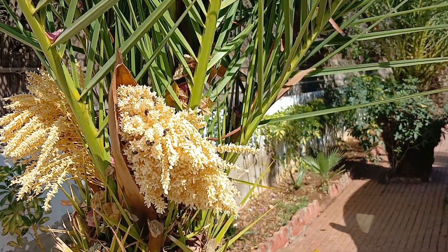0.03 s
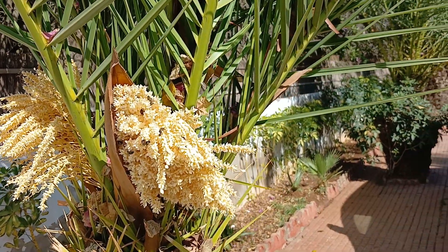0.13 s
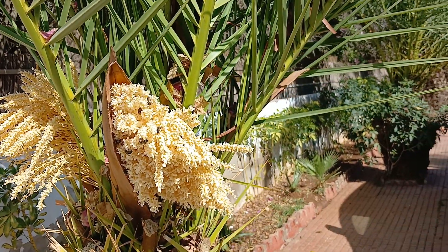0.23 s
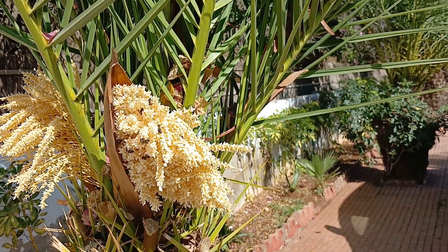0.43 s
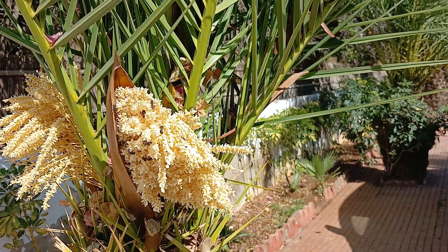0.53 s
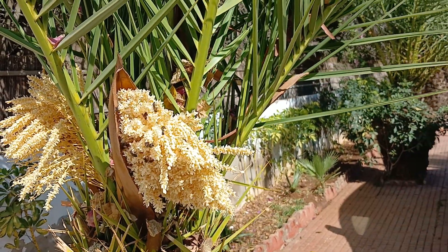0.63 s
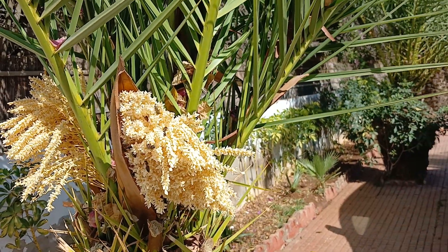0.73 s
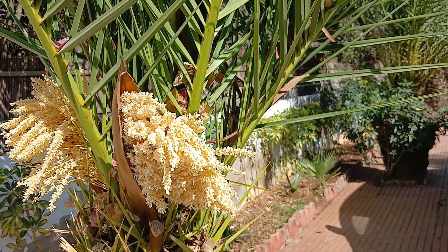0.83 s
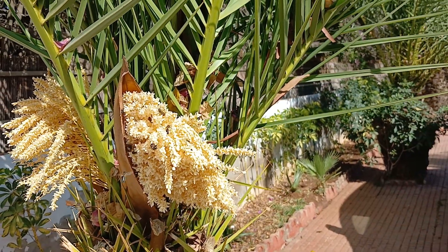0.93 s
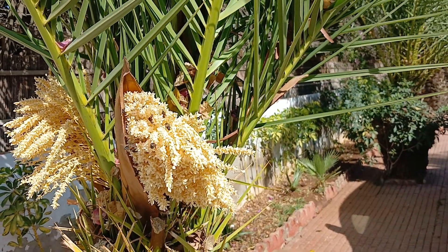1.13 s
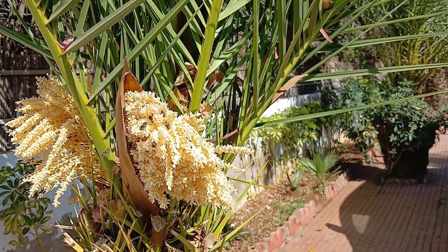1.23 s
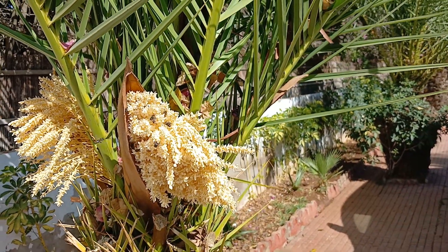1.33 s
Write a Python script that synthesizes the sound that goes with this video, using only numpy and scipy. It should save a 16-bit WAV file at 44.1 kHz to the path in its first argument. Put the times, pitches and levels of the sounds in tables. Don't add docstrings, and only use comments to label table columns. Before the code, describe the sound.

A bee buzzes extremely close to the left microphone outdoors, wings scraping the grille just before a hard, low thump; it flies off dulling, leaving a faint distant rumble and barely audible rustle of fronds.

```python
import sys
import numpy as np
from scipy import signal
from scipy.fft import rfft, irfft
from scipy.io import wavfile
from scipy.ndimage import uniform_filter1d

SR = 44100
rng = np.random.default_rng(int(sys.argv[2]) if len(sys.argv) > 2 else 0)


def natural_amplitude(level_db):
    exponent = np.asarray(level_db, float) / 20
    return 10 ** exponent


def dump(signal):
    limited = np.clip(np.atleast_2d(signal).T, -1, 1)
    pcm = np.round(limited * 32767).astype(np.int16)
    wavfile.write(sys.argv[1], SR, pcm)


N = 61739
T = np.arange(N) / SR
STROKE_AT = 0.4225


def curve(table, column):
    rows = np.array(table, float)
    return uniform_filter1d(np.interp(T, rows[:, 0], rows[:, column]), size=400)


def walk(rate):
    hold = int(SR / rate)
    steps = rng.standard_normal(N // 100 + 1)[:N // hold + 1]
    slewed = uniform_filter1d(np.repeat(steps, hold), hold)
    return 1.4 * uniform_filter1d(slewed, hold)[:N]


def unit(x):
    return x / np.sqrt(np.mean(x ** 2))


def colour(points, source=None):
    hz = np.arange(N // 2 + 1) * SR / N + 1
    rows = np.array(points, float)
    db = np.interp(np.log(hz), np.log(rows[:, 0]), rows[:, 1], left=-60, right=rows[-1, 1])
    if source is None:
        source = rng.standard_normal(N)
    return irfft(rfft(source) * natural_amplitude(db) * np.sqrt(SR / 2), N)


def bands(x, lift_db, swell, edge=12):
    flicker_db, swell_db = 1.0, 0.6
    spec = rfft(x)
    pitch = np.log2(np.arange(N // 2 + 1) * SR / N + 1)
    out = 0
    for octave in range(4, 16):
        share = np.cos(np.pi / 2 * np.clip(pitch - octave, -1, 1)) ** 2
        level = flicker_db * walk(14.37) + swell_db * swell + lift_db * (octave >= edge)
        out = out + irfft(spec * share, N) * natural_amplitude(level)
    return out


# [t/s, level/dB, treble lift/dB]
BREEZE = [(0, -90, 4.5), (.2, -90, 0.5), (.45, -87.5, -3.5), (.62, -94.5, 0), (.8, -95.5, -1.5),
          (.95, -96, 1), (1.05, -97, 0.5), (1.2, -101, 3.5), (1.4, -105, -2)]
# [f/Hz, level/dB per Hz]
FRONDS_LEFT = [(250, 0), (1050, -3), (1500, -15.5), (3800, -21), (6200, -19.5), (7900, -11.5),
               (8500, -20.5), (15800, -24)]
FRONDS_RIGHT = [(250, 9), (1100, 2), (2300, 0.5), (3800, -25.5), (6200, -16), (7900, -9), (8500, -19.5),
                (15800, -19.5)]


def fronds(swell):
    sides = [bands(colour(c), curve(BREEZE, 2), swell) for c in (FRONDS_LEFT, FRONDS_RIGHT)]
    return np.array(sides) * natural_amplitude(curve(BREEZE, 1))


# [f/Hz, level/dB per Hz]
RUMBLE = [(25, -39), (50, 3), (75, 5.5), (130, 3.5), (250, -8), (450, -21), (900, -48)]


def rumble(swell):
    level_db, right_db, side_share = -52.5, 2, 0.14
    mid = unit(bands(colour(RUMBLE), 0, swell))
    side = unit(bands(colour(RUMBLE), 0, swell))
    left = mid + side_share * side
    right = natural_amplitude(right_db) * (mid - side_share * side)
    breeze_db = 0.21 * (curve(BREEZE, 1) + 91.5)
    return natural_amplitude(level_db) * np.array([left, right]) * natural_amplitude(breeze_db)


# [t/s, f/Hz]
BEAT = [(.09, 229), (.135, 214), (.165, 219), (.25, 224.5), (.3, 234), (.39, 237.5), (.43, 236), (.5, 228),
        (.575, 211)]


def wing_cycle():
    jitter, crest_s = 0.003, 0.2969
    cycle = np.cumsum(curve(BEAT, 1) * (1 + jitter * walk(60))) / SR
    return cycle - np.interp(crest_s, T, cycle)


def stroke(cycle, width):
    offset = (cycle - STROKE_AT + 0.5) % 1 - 0.5
    return np.exp(-0.5 * (offset / width) ** 2)


def contact():
    start_s, rise_s, end_s = 0.289, 0.01, 0.3135
    return np.clip((T - start_s) / rise_s, 0, 1) * (T < end_s)


# [t/s, level/dB, near-field lift of the fundamental/dB, overtone lift/dB, wing hiss level/dB]
FLIGHT = [
    (0, -57, 12.5, 10, -61.5),
    (.065, -36.5, 11.5, 6, -52.5),
    (.12, -31.5, 2.5, -2, -48.5),
    (.2, -36, 8, 3.5, -47.5),
    (.29, -22.5, 5.5, -8, -44.5),
    (.36, -27.5, 2.5, -3, -45.5),
    (.45, -40.5, 3.5, -0.5, -52.5),
    (.56, -53, -9.5, 3.5, -64.5),
    (.65, -68.5, -11, 10, -95),
]
# [multiple, level/dB, wobble/dB]
OVERTONES = [(3, -17, 3.5), (4, -19.5, 5), (5, -14.5, 2.5), (6, -28, 4), (7, -28.5, 3.5), (8, -29, -0.5),
             (9, -28, 3.5), (10, -32, 4), (11, -33.5, -2), (12, -39.5, 4.5), (13, -40.5, 7)]
WOBBLE_MAX_DB = [3, 3, 1, 3.5]


def wing_tone(cycle):
    flutter_db, twist = 1.1, 0.95
    choke = uniform_filter1d(-6 * (contact() == 1), size=300)
    dull = -1 * np.clip((T - 0.45) / 0.055, 0, 1)
    level = curve(FLIGHT, 1)

    def tone(k, db, turn):
        return np.sqrt(2) * natural_amplitude(db) * np.cos(2 * np.pi * k * cycle + turn)

    out = tone(1, level + choke / 2 + curve(FLIGHT, 2) + flutter_db * walk(55.8), 0)
    out += tone(2, level + choke + flutter_db * walk(48.25), -1.7 + twist * walk(8.2))
    close = np.exp(-((T - 0.305) / 0.085) ** 4)
    rock = 10 * close * np.cos(2 * np.pi * (T - 0.306) / 0.051)
    tips = 0.075 * walk(230)
    for k, db, wobble_db in OVERTONES:
        k = round(k)
        lean = rock * (k == 3) + 5.5 * close * (k == 4) + dull * max(k - 5, 0)
        wobble_max = WOBBLE_MAX_DB[min(k - 3, len(WOBBLE_MAX_DB) - 1)]
        wobble = min(wobble_db, wobble_max) * walk(45.16)
        turn = -k + twist * walk(14.9) + k * tips
        out += tone(k, level + curve(FLIGHT, 3) + db + lean + wobble, turn)
    return out


# [f/Hz, level/dB per Hz]
HISS = [(700, 5), (1500, -12), (2600, -4), (4500, -5.5), (7500, -6.5), (8800, -10.5), (12000, -1),
        (15500, 2.5)]


def wing_hiss(cycle):
    turn_db = -10 * np.clip((T - 0.25) / 0.03, 0, 1)
    hiss = bands(unit(colour(HISS)), turn_db, walk(91), edge=13.4)
    return natural_amplitude(curve(FLIGHT, 4)) * hiss * (0.48 + stroke(cycle, 0.13))


# [t/s, peak level/dB, f/Hz, cycles]
PUFFS = [(0.308, -30.5, 145, 1.2), (0.313, -13, 181, 0.62), (0.3185, -6, 306, 1.04),
         (.3233, -5.5, 224, 0.61), (0.329, -7.5, 131.4, 1.02), (.3380, -13.5, 250, 1.35),
         (0.342, -13, 125, 1.08), (.350, -21, 293, 0.89), (0.357, -28, 80, .9), (0.4302, -21, 115, 0.68),
         (.4420, -22.5, 153, 1.9), (.4510, -19.5, 193, 0.98), (0.469, -45, 89, 1.2), (0.073, -49, 82, 2.5),
         (.51, -42, 54.6, 1.3), (0.528, -52, 105, 0.75)]


def puffs():
    out = np.zeros(N)
    for at, db, hz, cycles in PUFFS:
        bell = np.exp(-0.5 * ((T - at) * hz * 2 / cycles) ** 2)
        out += natural_amplitude(db) * bell * np.cos(2 * np.pi * hz * (T - at))
    return out


# [f/Hz, level/dB per Hz]
WAKE = [(60, 5), (150, -13), (400, -0.5), (800, -1), (1400, -18), (2600, -22), (4000, -38)]


def wake():
    at_s, rise_s, fall_s = 0.313, 0.02, 0.028
    near = np.exp(-np.abs(T - at_s) / np.where(T < at_s, rise_s, fall_s))
    return natural_amplitude(-33 + 5.7 * walk(68.6)) * near * unit(colour(WAKE))


# [f/Hz, level/dB per Hz]
BRUSH = [(1000, 11.5), (2500, -6), (4500, 2.5), (8000, -3.5), (10000, -12.5), (13000, -5), (15500, -0.5)]


def brush(cycle):
    brush_db, tick_db = -37, -45
    touch = contact()
    scrape = unit(colour(BRUSH)) * (0.29 + stroke(cycle, 0.05))
    beats = np.floor(cycle - STROKE_AT)
    ticks = np.diff(beats, prepend=beats[0]) * natural_amplitude(1.5 * walk(223))
    out = natural_amplitude(brush_db + 0.64 * walk(197)) * touch * scrape
    return out - natural_amplitude(tick_db) * touch * unit(colour(BRUSH, ticks))


def scene():
    swell = walk(7.74)
    garden = fronds(swell) + rumble(swell)
    cycle = wing_cycle()
    bee = wing_tone(cycle) + wing_hiss(cycle) + puffs() + wake() + brush(cycle)
    return garden + bee * np.array([[1], [0]])


def band_limit(x):
    return signal.sosfilt(signal.butter(12, 16140, fs=SR, output="sos"), x)


def record(dry):
    low_cut = signal.butter(2, 46, "high", fs=SR, output="sos")
    top_cut = signal.ellip(12, 0.3, 80, 15720, fs=SR, output="sos")
    mix = signal.sosfilt(top_cut, signal.sosfilt(low_cut, dry))
    return band_limit(mix)


dry = scene()
out = record(dry)
dump(out)
```